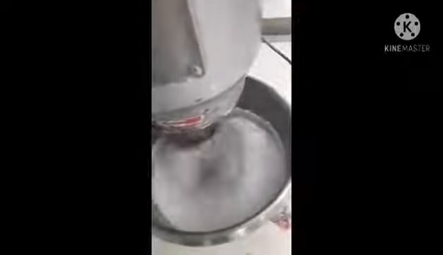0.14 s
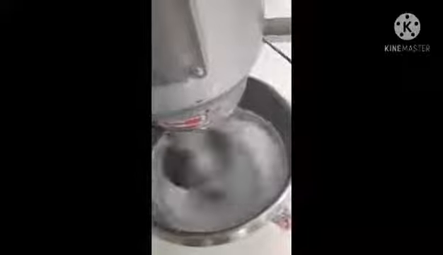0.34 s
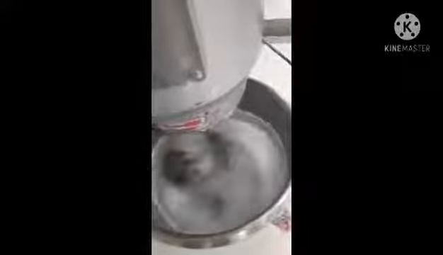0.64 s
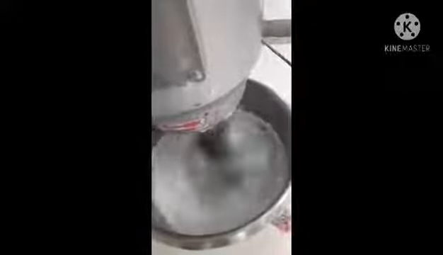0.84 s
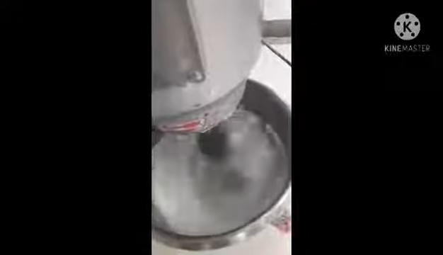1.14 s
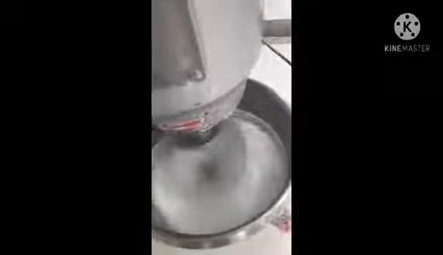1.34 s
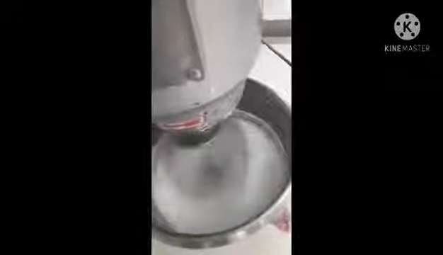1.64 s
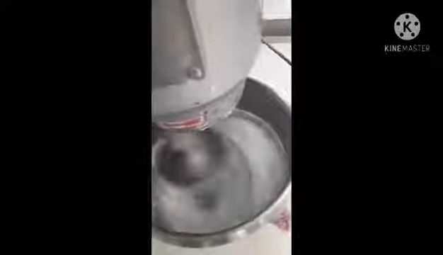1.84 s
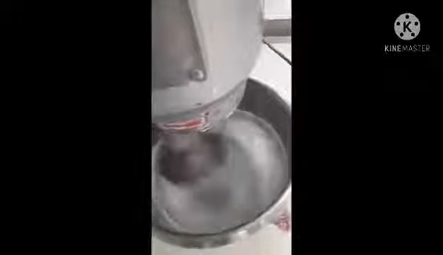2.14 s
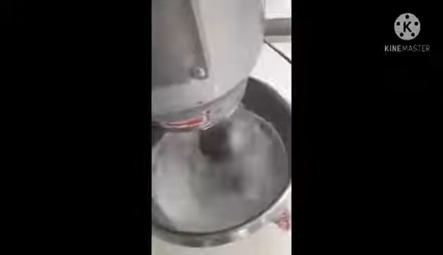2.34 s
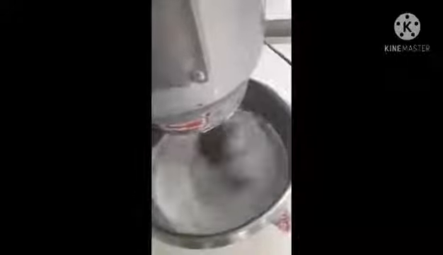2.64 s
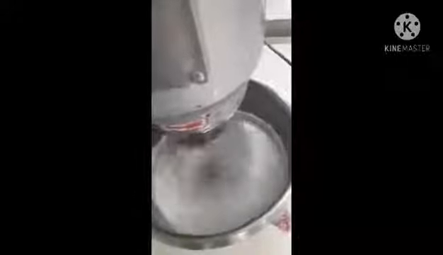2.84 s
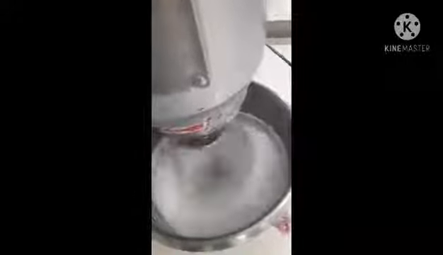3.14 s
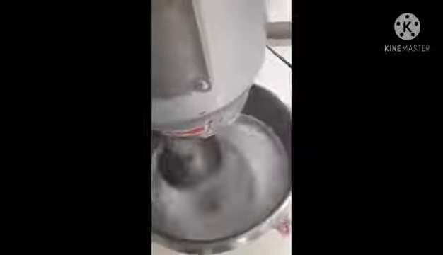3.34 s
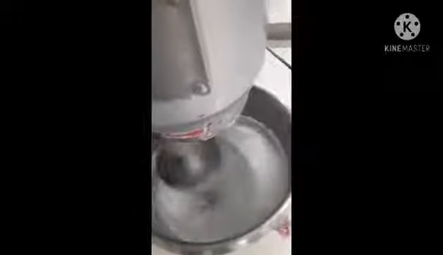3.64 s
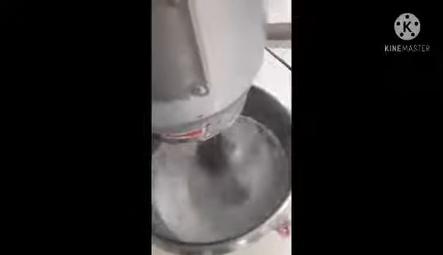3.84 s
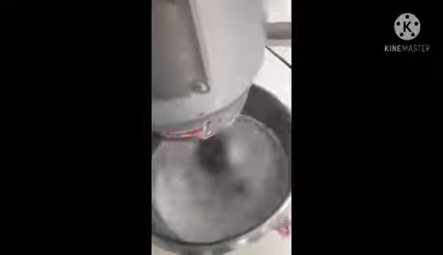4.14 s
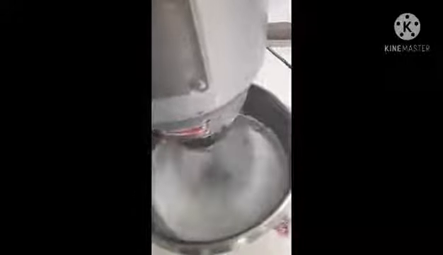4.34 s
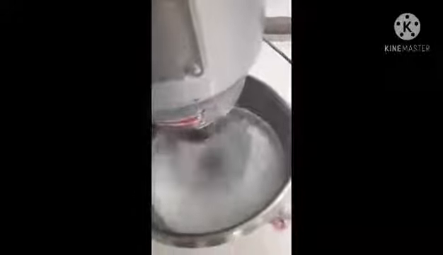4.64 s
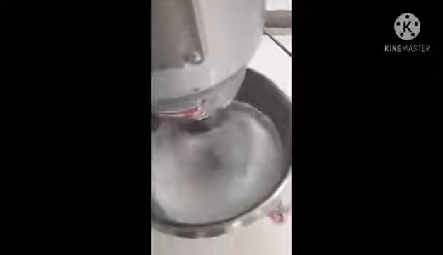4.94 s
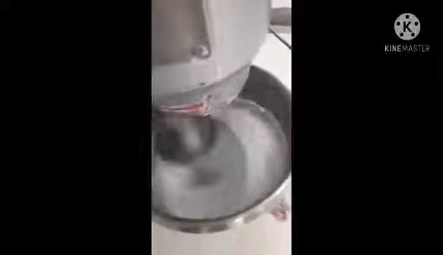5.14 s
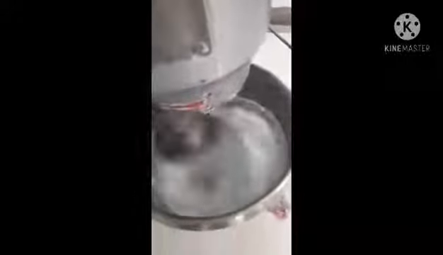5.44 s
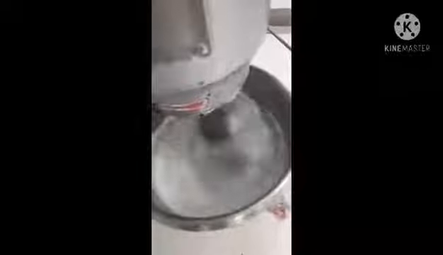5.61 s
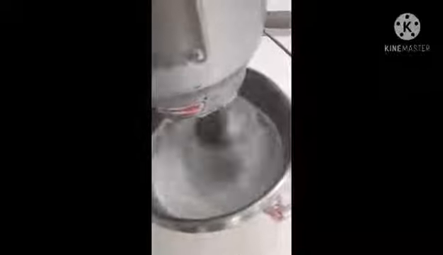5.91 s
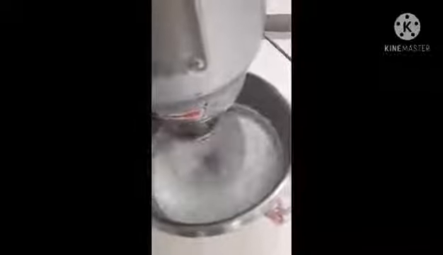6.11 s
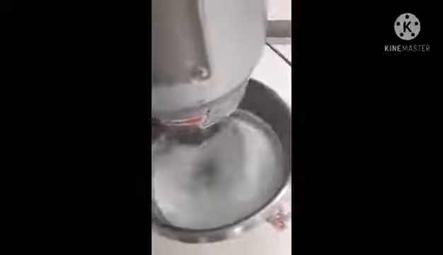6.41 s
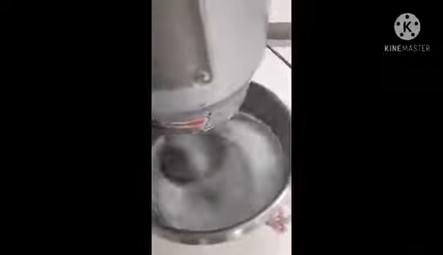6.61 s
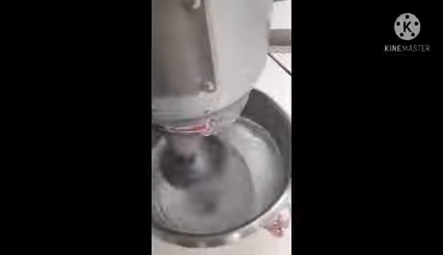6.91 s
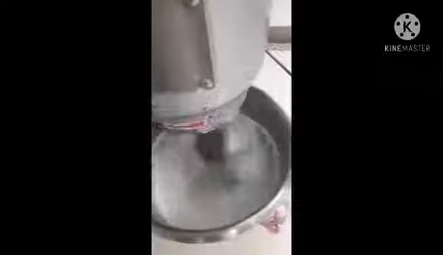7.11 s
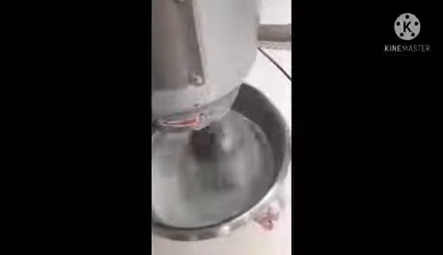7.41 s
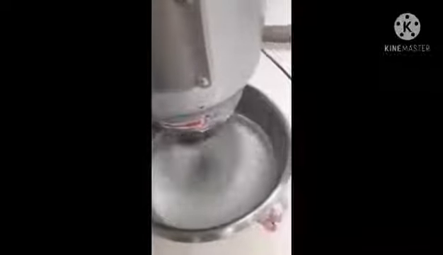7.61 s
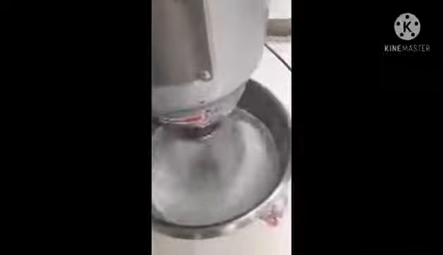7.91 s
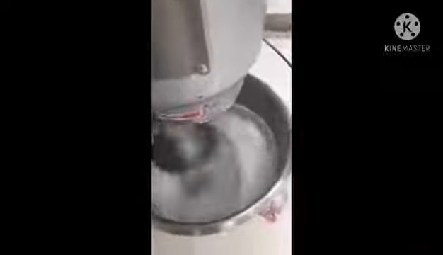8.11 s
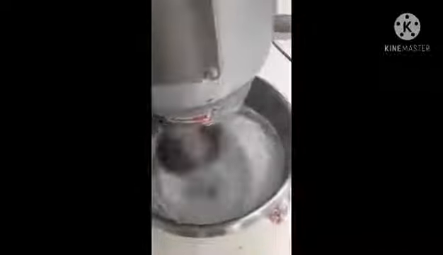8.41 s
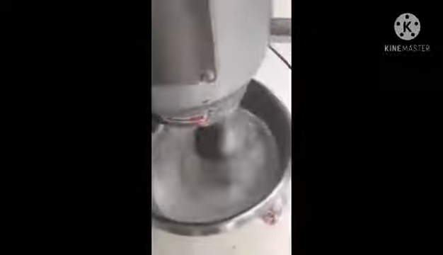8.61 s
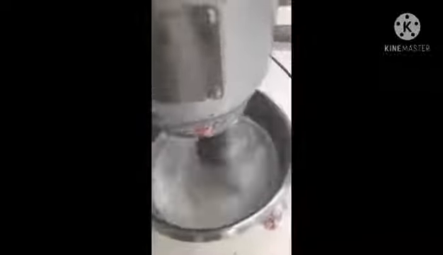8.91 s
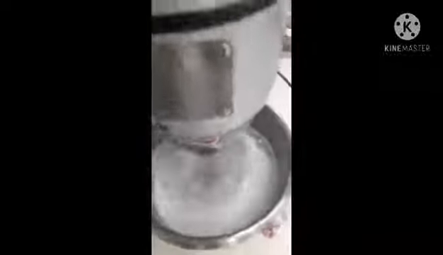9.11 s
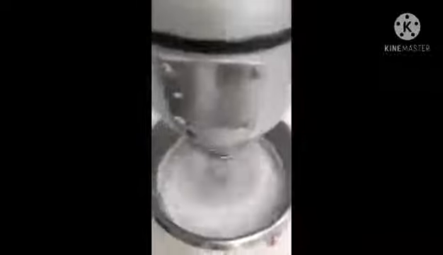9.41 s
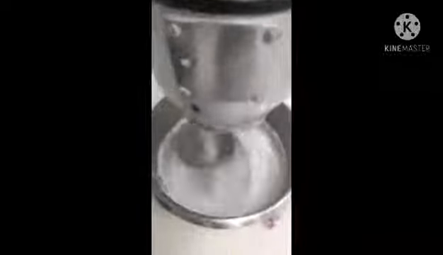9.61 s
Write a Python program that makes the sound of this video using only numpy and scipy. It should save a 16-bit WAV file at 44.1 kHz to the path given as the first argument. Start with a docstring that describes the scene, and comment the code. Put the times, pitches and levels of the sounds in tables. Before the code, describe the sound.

For nearly ten seconds an electric mixer whisks thin, foaming liquid in a steel bowl, already running at the start and still running at the end. The microphone is close above the bowl, in stereo, with little room sound. A dense low throb around 200 to 350 Hz pulses about 11.5 times a second over a steady gear drone and soft motor hum. Every pass sprays fizzing bubbles and droplets with a fine wire rattle, and a hollow ringing near 700 Hz bends gently up and down about three times a second. Heavy liquid slaps land irregularly, strong near 2.2, 4.6, 6.8 and 8.9 seconds. Bigger splashes rise around 0.3, 1.5, 3.5 to 3.9 and 8.95. Wet splats pop now and then, and short wire raps click at about 1.5, 3.7, 5.0, 8.0 and 9.2 seconds.

```python
"""Stand mixer whisking a thin foam

A whisk turns at one steady speed in a steel bowl, close below the microphone.
It ploughs the liquid 11.5 times a second: filtered noise makes the bowl throb, over a gear drone of sines.
Wire ticks, droplets and ringing bubbles make the spray; the air in the bowl rings and sways in pitch.
Short decaying tones and noise bursts are pushes, gulps, slaps, splats and wire raps; the motor hums."""
import sys
import numpy as np
from scipy import signal
from scipy.fft import rfft, irfft, next_fast_len
from scipy.io import wavfile
from scipy.ndimage import uniform_filter1d

SR = 44100
rng = np.random.default_rng(int(sys.argv[2]) if len(sys.argv) > 2 else 0)


def int16_out(signal):
    """Quantize to a 16-bit WAV file."""
    q = np.round(np.clip(np.atleast_2d(signal).T, -1, 1) * 32767)
    wavfile.write(sys.argv[1], SR, q.astype(np.int16))


N = 429975
TIME = np.arange(N) / SR
PASS_HZ, FIRST_PASS_S, WIRES_PER_PASS = 11.485, 0.0606, 6
ORBIT_HZ, SLOSH_HZ = 3.352, 2.6  # circling of the whisk; corner of the slow random level


def from_db(db):
    """Decibels to gain."""
    return 10 ** (np.asarray(db) / 20)


def rms_one(x):
    """Scale to unit power."""
    return x / np.sqrt(np.mean(x ** 2) + 1e-20)


def drift(corner_hz):
    """Slow random curve with spread 1: noise through two equal poles, at 1/40 of the sample rate."""
    step = 40
    r = np.exp(-2 * np.pi * corner_hz * step / SR)
    noise = rng.standard_normal(N // step + 2002)
    slow = signal.lfilter([1], [1, -2 * r, r * r], noise)[2000:]  # drop the settling
    return np.interp(np.arange(N) / step, np.arange(len(slow)), rms_one(slow))


def colour(x, points):
    """Minimum-phase filter through (Hz, dB) points, from the folded cepstrum."""
    size = 2 * next_fast_len(N // 2 + SR // 10)
    hz, db = np.transpose(points)
    bins_hz = np.maximum(np.arange(size // 2 + 1) * SR / size, 1)
    gain = from_db(np.interp(np.log(bins_hz), np.log(hz), db))
    cepstrum = irfft(np.log(gain))
    cepstrum[1:size // 2] *= 2
    cepstrum[size // 2 + 1:] = 0
    response = np.exp(rfft(cepstrum))
    return irfft(rfft(x, size) * response)[..., :N]


def resonate(x, hz, width_hz):
    """Two-pole resonance with gain 1 on top."""
    r = np.exp(-np.pi * width_hz / SR)
    zeros = np.array([1, 0, -1]) * (1 - r * r) / 2
    poles = [1, -2 * r * np.cos(2 * np.pi * hz / SR), r * r]
    return signal.lfilter(zeros, poles, x + 1e-18)


def resonate_twice(x, hz, width_hz):
    """Two equal resonances in series, for steep skirts."""
    return resonate(resonate(x, hz, width_hz), hz, width_hz)


def stereo(mid, side):
    """Left and right from sum and difference."""
    return np.array([mid + side, mid - side])


def load(level_db, orbit_db, top_s, uneven_db):
    """Level in dB from the liquid the whisk meets: a swell per orbit plus random sloshing."""
    swell = np.cos(2 * np.pi * ORBIT_HZ * (TIME - top_s))
    return level_db + orbit_db * swell + uneven_db * drift(SLOSH_HZ)


def plough(depth_db, lead_s, sharp, wire_db, lean):
    """Force on the liquid: up as the whisk dives in, down as it leaves, rippled by each wire."""
    angle = 2 * np.pi * PASS_HZ * (TIME - FIRST_PASS_S + lead_s)
    immersed = np.tanh(sharp * np.cos(angle + lean * np.cos(angle)))
    ripple = (1 + immersed) / 2 * np.cos(WIRES_PER_PASS * angle)
    return rms_one(from_db(depth_db * immersed + wire_db * ripple))


def churn(modes, force):
    """Turbulence: separate noise, shaped by a power of the force, shakes each mode."""
    total = np.zeros(N)
    for hz, width_hz, db, follow in modes:
        shaking = rms_one(force ** follow) * rng.standard_normal(N)
        total += from_db(db) * resonate_twice(shaking, hz, 1.55 * width_hz)  # about width_hz after both
    return rms_one(total)


# Gear drone. Each row: multiple of the pass rate, relative level in dB.
GEAR_LINES = [(19, -30), (22, -38), (26, -36.5), (28, -40.5), (31, -40)]


def gears():
    """Meshing teeth: harmonics of the pass rate with wandering phase, louder under load."""
    strain = plough(depth_db=2.0, lead_s=-0.0058, sharp=1.0, wire_db=3.5, lean=0.2)
    drone = np.zeros(N)
    for order, db in GEAR_LINES:
        turns = round(order) * PASS_HZ * TIME + rng.random()
        drone += from_db(db) * np.sqrt(2) * np.sin(2 * np.pi * turns + 0.47 * drift(0.66))
    return strain * drone


def steady(x):
    """Even out the power with two one-pass averages; the throb within each pass stays."""
    size = round(SR / PASS_HZ)
    power = uniform_filter1d(uniform_filter1d(x ** 2, size), size)
    return x / np.sqrt(power + 1e-12)


# Filled bowl, damped by the liquid.
# Each row: pitch in Hz, width in Hz, relative level in dB, exponent on the whisk force.
BOWL_RESONANCES = [(94, 87, -14.5, .6), (159, 14, -11, .8), (221.7, 33.6, 1, 0.59),
                   (256.3, 75.6, -4.5, 0.85), (310.4, 43, -1, 1.9), (344.6, 53, -10, 1.2),
                   (383, 26, -8, 1.2)]


def throb():
    """Low throb: bowl modes shaken by the churning liquid share the work with the gears."""
    level_db = load(level_db=-22, orbit_db=0.33, top_s=0.21, uneven_db=0.5)
    force = plough(depth_db=1.0, lead_s=0.0015, sharp=13.0, wire_db=-0.5, lean=0.3)
    mid = steady(from_db(-20.5) * churn(BOWL_RESONANCES, force) + gears())
    side = from_db(-18.0) * churn(BOWL_RESONANCES, force)
    return from_db(level_db) * stereo(mid, side)


# Passes that throw a big splash. Each row: time of the top in seconds, extra force in dB.
BIG_SPLASHES = [(0.313, 4), (0.504, 1), (0.928, 1.5), (1.458, 4), (3.528, 4), (3.732, 4), (3.889, 2.5),
                (4.25, 2.5), (4.932, 2.5), (5.269, 0.5), (5.714, 1.2), (6.406, 1.6), (6.588, 1.5),
                (8.157, 1.5), (8.586, 0.5), (8.95, 6)]


def spray_force(splash_width_s=0.012):
    """Force of each pass on the surface, raised on the passes that splash."""
    s = TIME[::40]
    surge_db = np.zeros(len(s))
    for top_s, db in BIG_SPLASHES:
        surge_db += db * np.exp(-((s - top_s) / splash_width_s) ** 2)
    force = plough(depth_db=2.0, lead_s=0.0013, sharp=2.9, wire_db=-0.5, lean=0.6)
    return force * from_db(np.interp(TIME, s, surge_db))


def droplets(force, per_s=1200):
    """Random impacts, more and stronger with force; sum and difference get separate strengths."""
    born = rng.random(N) < per_s * force / SR
    return rms_one(born * force * rng.standard_normal((2, N)))


def wires(force, jitter_s=0.002, uneven_db=2.0, fade_s=0.0012):
    """Wires flick the surface in turn: a fine rattle of uneven, fading noise ticks."""
    wire_hz = PASS_HZ * WIRES_PER_PASS
    turns = np.arange(int(N / SR * wire_hz))
    late, strength = rng.standard_normal((2, len(turns)))
    at = np.clip((turns / wire_hz + jitter_s * late) * SR, 0, N - 1).astype(int)
    flicks = np.zeros(N)
    flicks[at] = force[at] * from_db(uneven_db * np.minimum(strength, 1))
    fading = signal.lfilter([1], [1, -np.exp(-1 / (fade_s * SR))], flicks + 1e-18)
    return rms_one(fading * rng.standard_normal((2, N)))


def bubbles(force, size_db=-0.2, cycles=36, patchy_db=2.5, linger_hz=9000, per_s_at_1khz=60):
    """Bubbles of 76 sizes burst and ring briefly; small ones are more numerous, like sizes cloud."""
    out = np.zeros((2, N))
    for k, hz in enumerate(np.geomspace(450, 12800, 76)):
        if k % 4 == 0:  # four neighbouring sizes share a cloud
            follow = 1 / np.sqrt(1 + (hz / linger_hz) ** 2)  # the finest foam fizzes on between passes
            cloud = force ** follow * from_db(follow * patchy_db * drift(13.0))
        at = rng.integers(0, N, int(per_s_at_1khz * hz / 1000 * N / SR))
        uneven = from_db(size_db * np.minimum(rng.exponential(1, len(at)), 5))
        sizes = rms_one(cloud[at] * uneven)
        bearing = rng.uniform(0, 2 * np.pi, len(at))
        pops = np.zeros((2, N))
        pops[:, at] = sizes / np.sqrt(hz) * [np.cos(bearing), np.sin(bearing)]  # equal power per Hz
        out += resonate(pops, hz, hz / cycles)
    return rms_one(out)


# Spray filter. Each row: frequency in Hz, gain in dB.
SPRAY_COLOUR = [(200, -5), (500, -18.5), (800, 1), (1100, 2.5), (1550, 1), (2000, -3), (2500, -3.5),
                (3900, -6.5), (6000, -15.5), (7200, -17.5), (8700, -6.5), (10100, -28), (12600, -17.5),
                (14000, -53)]
# Spray width: gain of the difference signal. Each row: frequency in Hz, gain in dB.
SPRAY_WIDTH = [(100, -52), (400, 15.5), (700, -0.5), (890, 0), (1000, -15.5), (1350, -4.5), (1650, -3),
               (1970, 1.5), (2330, -5), (3000, -2), (3500, 0), (4700, 0.5), (5200, 2), (7000, 0),
               (14000, 0.5)]


def spray():
    """Wires rattle through the surface and fling drops at the wall; foam bubbles burst."""
    level_db = load(level_db=-28.5, orbit_db=0.5, top_s=0.094, uneven_db=0.1)
    force = spray_force()
    drops = droplets(force) + from_db(-4.5) * wires(force)
    soften = signal.butter(1, 4000, fs=SR, output="sos")  # soft, wet contacts
    drops = rms_one(signal.sosfilt(soften, drops))
    mid, side = rms_one(colour(bubbles(force) + from_db(-8.5) * drops, SPRAY_COLOUR))
    return from_db(level_db) * stereo(mid, colour(side, SPRAY_WIDTH))


# Air in the bowl. Each row: pitch in Hz before the sweep, width in Hz, relative level in dB.
AIR_RESONANCES = [(590.5, 47, 2), (673, 32, 8.5), (734.3, 30, 11), (786, 41, -0.5), (881, 35, -3.5),
                  (1528, 74, -0.5)]


def cavity(force, sweep=0.0281, top_s=0.1108):
    """Ringing air; the circling whisk bends all pitches together by the share sweep, once per orbit."""
    turn = 2 * np.pi * ORBIT_HZ
    bent_time = TIME + sweep / turn * np.sin(turn * (TIME - top_s))
    ringing = churn([(*mode, 1) for mode in AIR_RESONANCES], force)
    return np.interp(bent_time, TIME, ringing)


def air():
    """Air resonances driven by the spray force, nearly centred."""
    level_db = load(level_db=-34.5, orbit_db=1.4, top_s=0.17, uneven_db=0)
    force = spray_force()
    return from_db(level_db) * stereo(cavity(force), from_db(-17.0) * cavity(force))


# Motor hum. Each row: pitch in Hz, RMS level in dB.
HUM_LINES = [(95, -50), (118.5, -40.5), (440, -46.5)]
# Frame rumble filter. Each row: frequency in Hz, gain in dB.
RUMBLE_COLOUR = [(15, -40), (40, -6.5), (80, 5), (150, 3), (400, -3.5), (900, -4), (3000, -35)]


def motor():
    """Slightly wavering sines over filtered noise, the rumble of the frame."""
    hum = np.zeros(N)
    for hz, db in HUM_LINES:
        wavering_hz = hz * (1 + 0.0013 * drift(2.4))
        hum += from_db(db) * np.sqrt(2) * np.sin(2 * np.pi * np.cumsum(wavering_hz) / SR)
    rumble = rms_one(colour(rng.standard_normal((2, N)), RUMBLE_COLOUR))
    mid, side = from_db(-35.0) * rumble
    return stereo(mid + hum, from_db(-14.5) * side)


def blows(events, shape):
    """Lay one 0.1 s sound at each event, scaled to its peak level in dB."""
    out, age = np.zeros(N + SR), np.arange(SR // 10) / SR
    for s, db, *traits in events:
        at = max(round(s * SR), 0)
        sound = shape(age, *traits)
        out[at:at + len(age)] += from_db(db) * sound / np.abs(sound).max()
    return out[:N]


def each_pass(delay_s, db, spread_db, hz, spread):
    """One event per pass with random strength and pitch: rows of seconds, peak dB, Hz."""
    s = np.arange(FIRST_PASS_S, N / SR, 1 / PASS_HZ)
    strength, pitch = np.clip(rng.standard_normal((2, len(s))), -2, 2)
    return np.transpose([s + delay_s, db + spread_db * strength, hz * (1 + spread * pitch)])


def slap(age, hz, swell_s=0.0079):
    """A soft mass of liquid pushes the wall, which swings a few times."""
    return age * np.exp(-age / swell_s) * np.sin(2 * np.pi * hz * age)


def pushes(swell_s=0.013):
    """Every pass without a heavy slap leans on the wall and sets it swinging at one pitch."""
    rows = each_pass(delay_s=-0.01797, db=-19, spread_db=2, hz=283, spread=0.111)
    heavy_s = np.transpose(HEAVY_SLAPS)[0]
    light = [row for row in rows if np.abs(heavy_s - row[0]).min() > 0.5 / PASS_HZ]
    return blows([(*row, swell_s) for row in light], slap)


def splat(age, hz, crack_db, ring_s=0.0049, crack_s=0.034, wet_db=6):
    """A wet crack of noise and the brief ring of an air pocket."""
    crack = resonate(rng.standard_normal(len(age)), 1200, 2400) * np.exp(-age / crack_s)
    ring = np.sin(2 * np.pi * hz * age) * np.exp(-age / ring_s)
    return from_db(crack_db + wet_db) * crack + ring


def gulps(crack_db=-20, ring_s=0.0055):
    """The furrow closes between two passes and traps a little air: a soft gulp."""
    rows = each_pass(delay_s=0.0515, db=-32.5, spread_db=3.0, hz=693, spread=0.11)
    return blows([(*row, crack_db, ring_s) for row in rows], splat)


# Heavy slaps of liquid on the bowl. Each row: start in seconds, relative peak in dB, pitch in Hz.
HEAVY_SLAPS = [(0.133, -9.5, 240), (0.31, -9, 283), (0.915, -10, 283), (1.109, -10.5, 220),
               (1.367, -15, 256), (1.546, -12, 213), (2.057, -10, 297), (2.131, -21, 270),
               (2.23, -7.5, 299), (2.495, -11, 260), (2.661, -14, 282), (3.278, -10, 274),
               (3.553, -11.5, 237), (3.884, -22, 232), (4.437, -10, 224), (4.586, -5.5, 225),
               (5.016, -10.5, 241), (5.109, -10, 295), (5.277, -8.5, 308), (5.377, -14, 310),
               (5.463, -9.5, 283), (5.613, -11, 250), (6.145, -10, 229), (6.32, -8.5, 284),
               (6.575, -10, 228), (6.762, -12.5, 318), (6.838, -8, 230), (7.285, -14, 217),
               (7.454, -10.5, 263), (7.79, -13.5, 224), (8.405, -11, 225), (8.571, -11.5, 293),
               (8.767, -15, 231), (8.857, -21, 241), (8.939, -8, 295)]


def slaps():
    """Heavy masses of liquid strike the wall and stand out of the throb."""
    return from_db(-2.5) * blows(HEAVY_SLAPS, slap)


# Gobs on the wall. Each row: start in seconds, relative peak in dB, pitch of the trapped air in Hz,
# relative level of the wet crack in dB.
WALL_SPLATS = [(0.307, -18.5, 760, -14), (0.918, -19, 700, -23), (2.132, -17.5, 760, -16),
               (2.551, -16, 694, -18), (2.742, -19, 738, -13), (2.822, -18.5, 790, -15),
               (3.115, -19.5, 775, -22), (3.27, -23, 692, -10), (3.449, -23, 700, -13),
               (3.733, -23, 695, -11), (3.875, -16, 740, -30), (4.378, -17, 860, -14),
               (7.184, -19, 720, -22), (8.815, -21.5, 690, -22), (8.937, -19, 780, -14),
               (9.274, -21.5, 1180, -12), (9.625, -19.5, 660, -13)]


def splats():
    """Larger gobs hit the wall now and then, each trapping a pocket of air."""
    return from_db(3.5) * blows(WALL_SPLATS, splat)


def tick(age, hz, fade_s, width_hz=3600):
    """A short, dull crack through the liquid: fading noise in a broad resonance."""
    return resonate_twice(rng.standard_normal(len(age)) * np.exp(-age / fade_s), hz, width_hz)


# Wire raps. Each row: start in seconds, relative peak in dB, brightness in Hz, fade in seconds.
WIRE_RAPS = [(0.3075, -15, 1400, .0015), (1.455, -8, 1900, .002), (2.157, -14, 1500, .003),
             (3.523, -12, 2400, .002), (3.734, -4, 2200, 0.0025), (3.961, -16, 1400, .002),
             (4.853, -8, 3200, .001), (5.0075, 0, 2600, 0.00032), (5.465, -9, 1500, .002),
             (6.946, -15, 2600, .0015), (7.190, -18, 1300, .002), (7.990, -8, 3400, .001),
             (8.171, -16, 3400, .0015), (9.2115, -9, 1500, .0015), (9.2755, -14, 1200, .002)]


def raps():
    """A wire raps the bowl."""
    return from_db(-12.0) * blows(WIRE_RAPS, tick)


def scene():
    """All sources; the single blows are centred."""
    whisking = throb() + spray() + air() + motor()
    return whisking + pushes() + gulps() + slaps() + splats() + raps()


# Phase lead of left over right. Each row: frequency in Hz, lead in radians.
LEFT_PHASE_LEAD = [(50, 0), (250, 0.067), (450, 0.94), (650, 0), (950, 0.83), (1380, 1.25), (1650, 0.12),
                   (2200, 0)]
# Left side of the microphone. Each row: frequency in Hz, gain in dB.
LEFT_COLOUR = [(60, -10), (200, 0.45), (370, -2.5), (700, 0), (1300, -1.5), (6300, 3.5), (8600, -12.5),
               (10500, -6.5), (13000, 0.5)]
# Right side of the microphone. Each row: frequency in Hz, gain in dB.
RIGHT_COLOUR = [(60, -5.5), (200, 1.5), (370, 2), (700, 1), (1300, -2), (6300, 3), (8600, -3.5),
                (10500, -3), (13000, 3)]


def record(dry):
    """Colour each side, hold back the phase of the right in the lead bands, cut the top steeply."""
    hz, lead_rad = np.transpose(LEFT_PHASE_LEAD)
    size = 2 * next_fast_len(N // 2 + SR // 10)
    bins_hz = np.arange(size // 2 + 1) * SR / size
    turn = np.exp(-1j * np.interp(bins_hz, hz, lead_rad))
    right = irfft(rfft(dry[1], size) * turn)[:N]
    heard = np.array([colour(dry[0], LEFT_COLOUR), colour(right, RIGHT_COLOUR)])
    low_pass = signal.ellip(12, 0.2, 80, 13100, fs=SR, output="sos")  # ripple dB, stop dB, cutoff Hz
    return signal.sosfilt(low_pass, heard)


dry = scene()
out = record(dry)
int16_out(out)
```